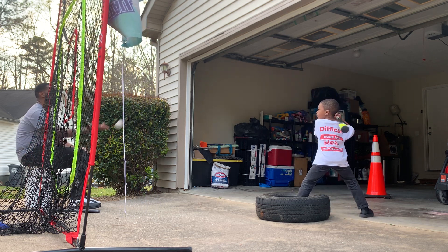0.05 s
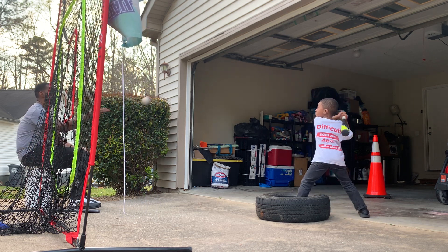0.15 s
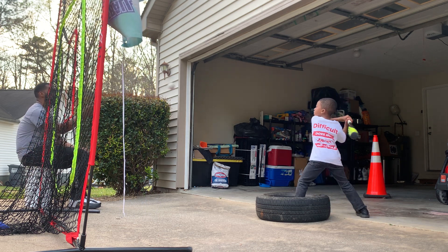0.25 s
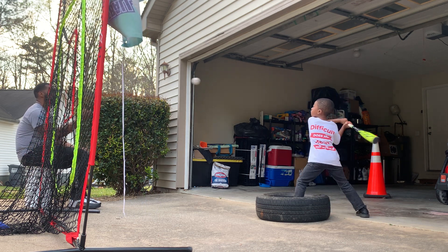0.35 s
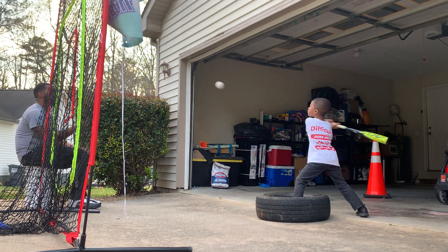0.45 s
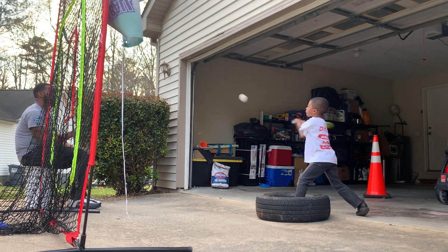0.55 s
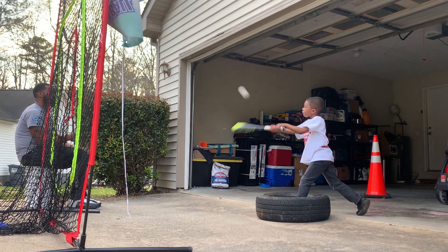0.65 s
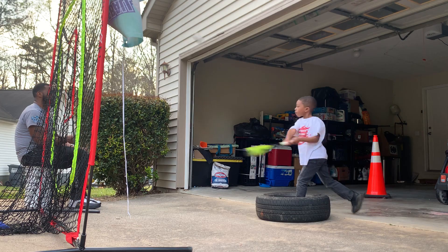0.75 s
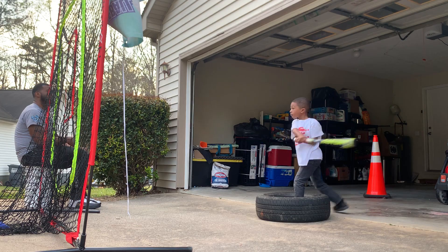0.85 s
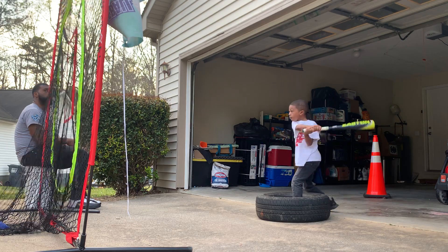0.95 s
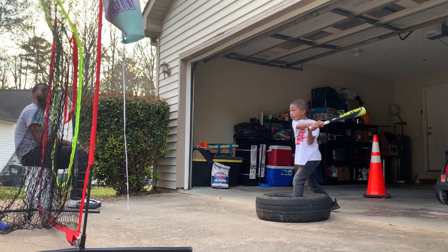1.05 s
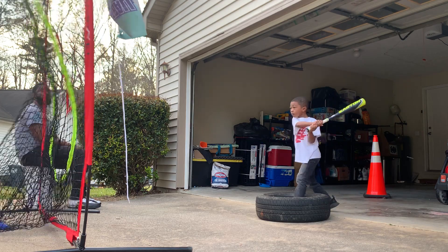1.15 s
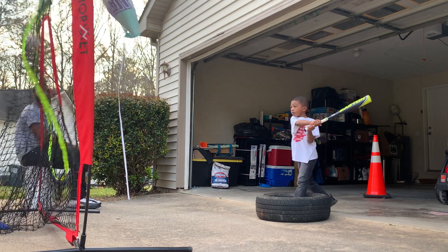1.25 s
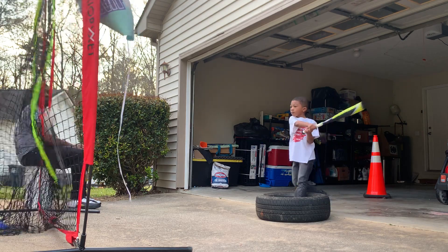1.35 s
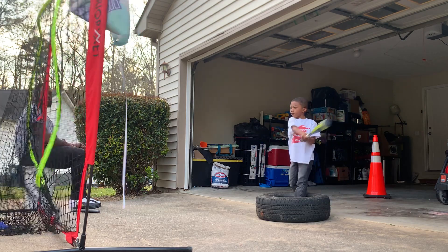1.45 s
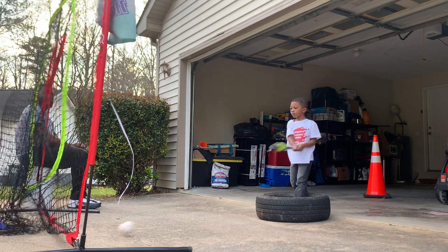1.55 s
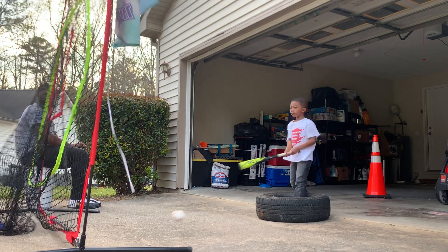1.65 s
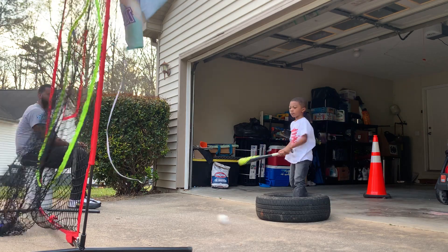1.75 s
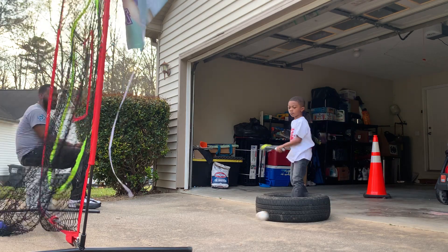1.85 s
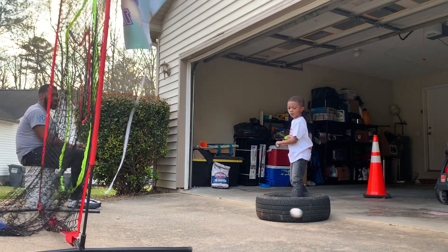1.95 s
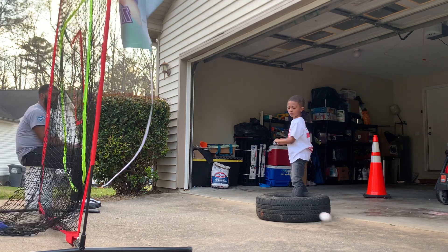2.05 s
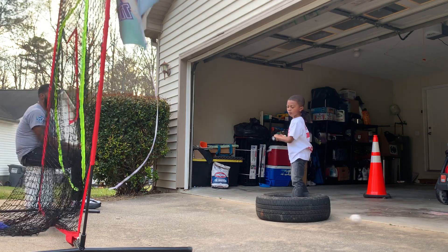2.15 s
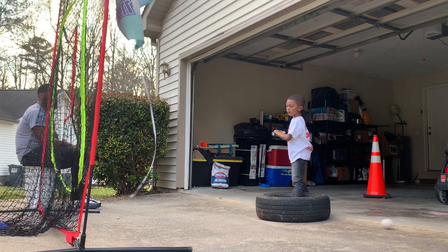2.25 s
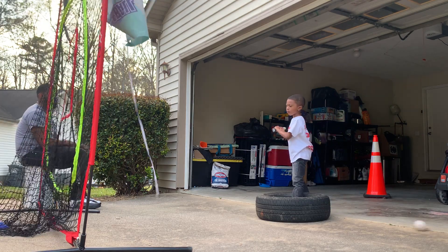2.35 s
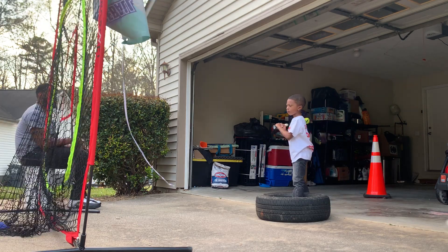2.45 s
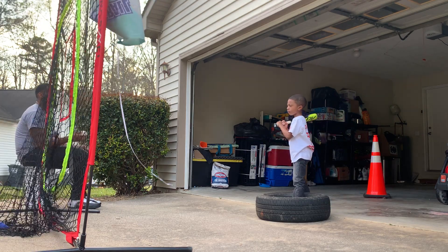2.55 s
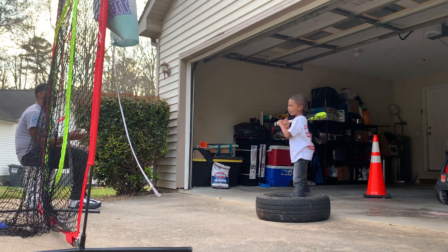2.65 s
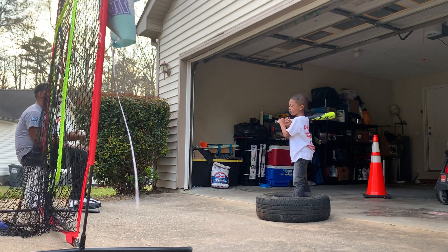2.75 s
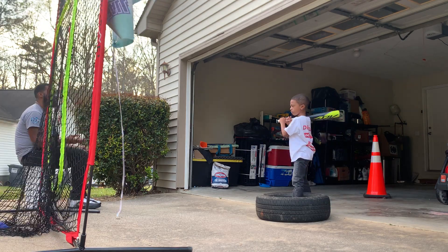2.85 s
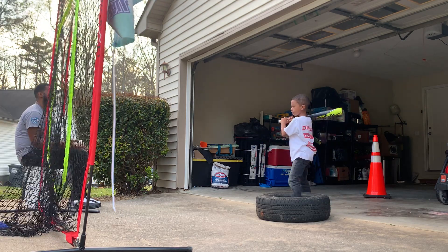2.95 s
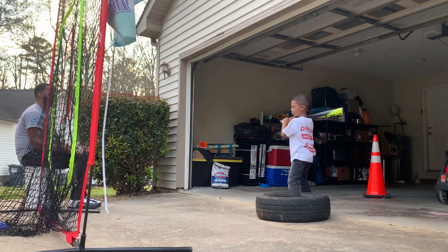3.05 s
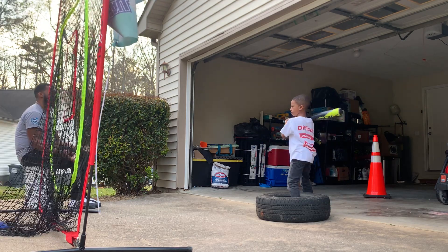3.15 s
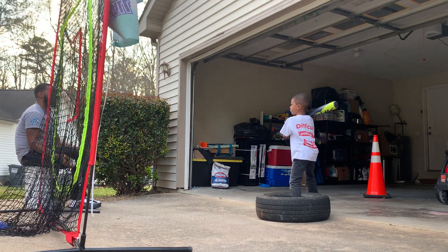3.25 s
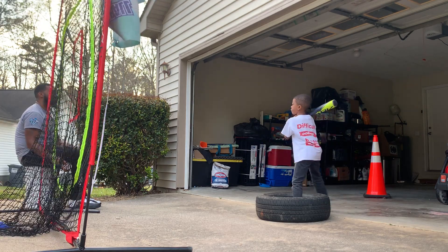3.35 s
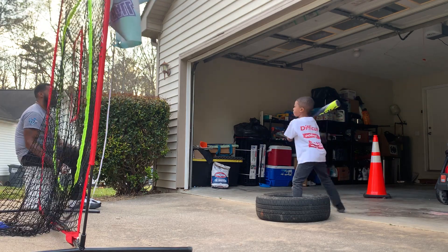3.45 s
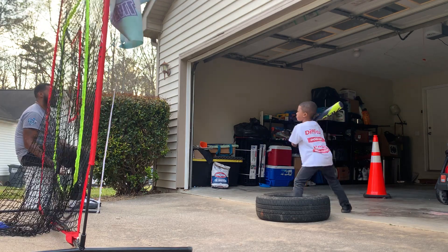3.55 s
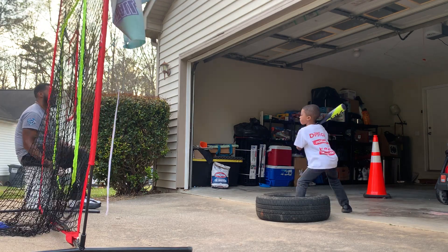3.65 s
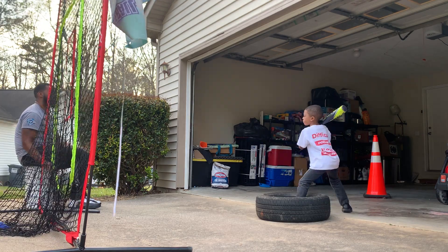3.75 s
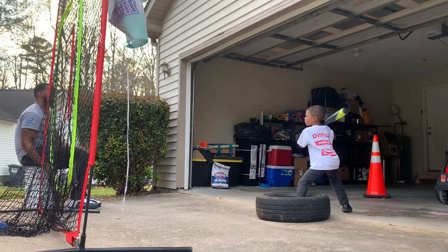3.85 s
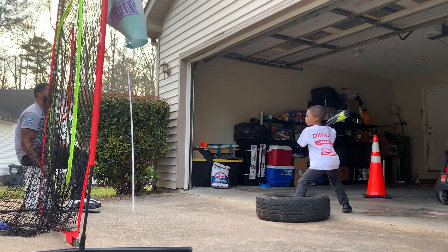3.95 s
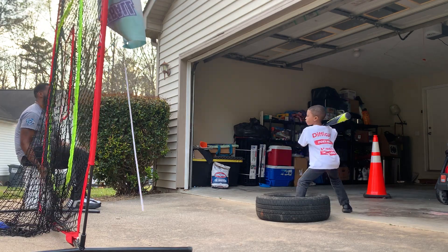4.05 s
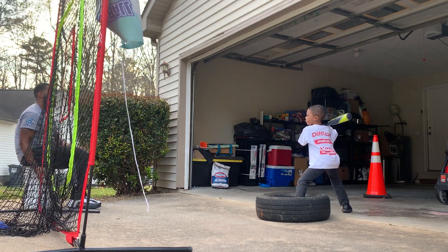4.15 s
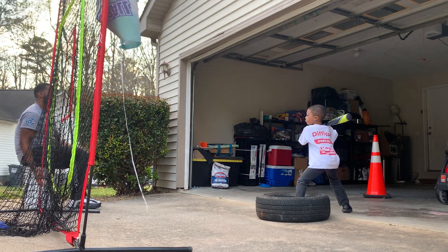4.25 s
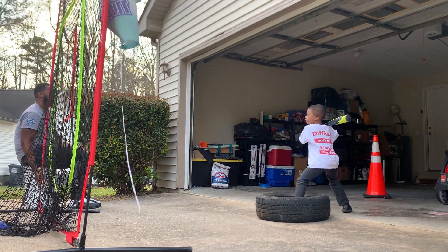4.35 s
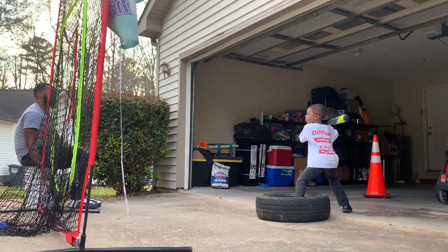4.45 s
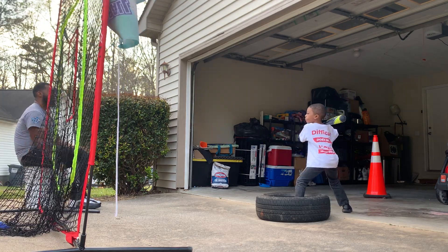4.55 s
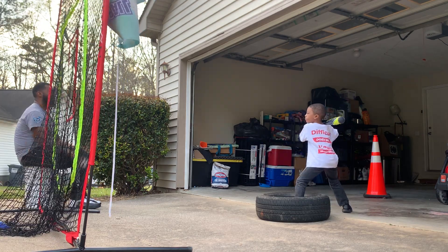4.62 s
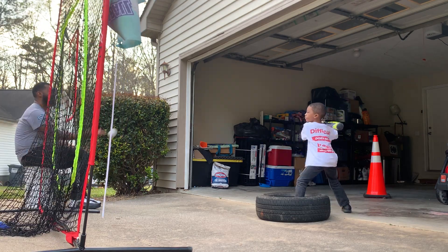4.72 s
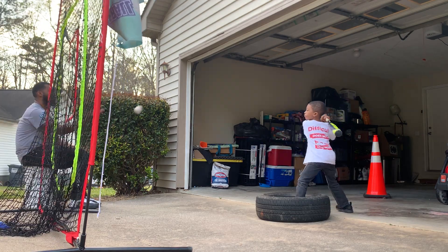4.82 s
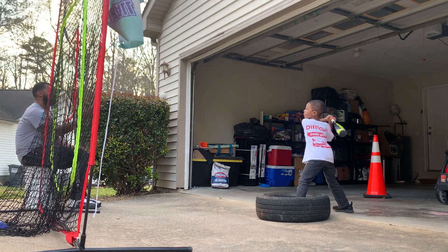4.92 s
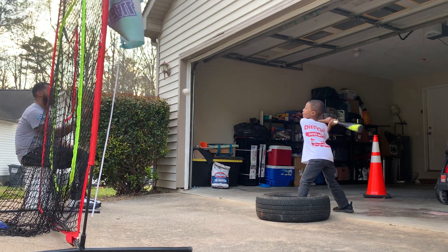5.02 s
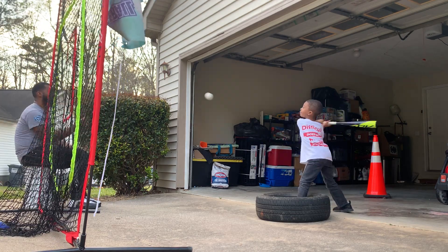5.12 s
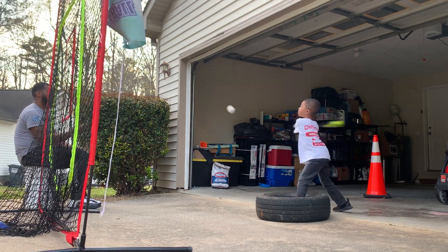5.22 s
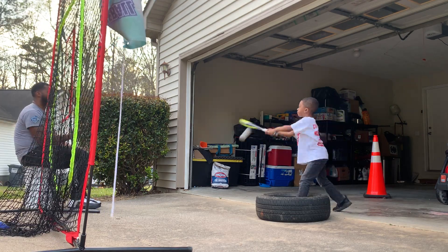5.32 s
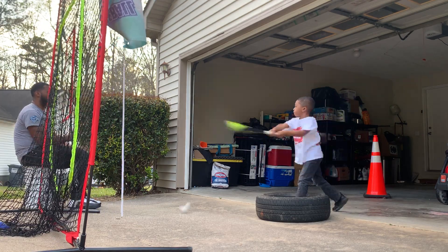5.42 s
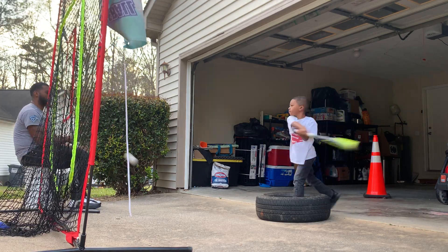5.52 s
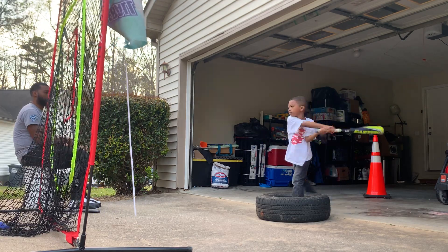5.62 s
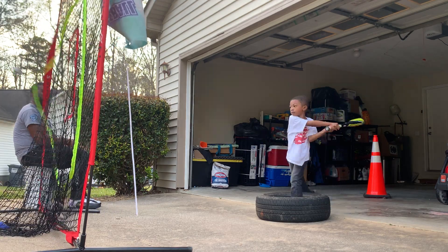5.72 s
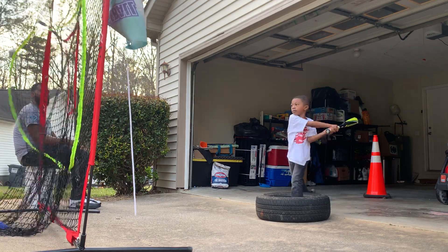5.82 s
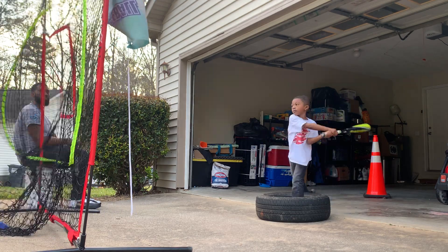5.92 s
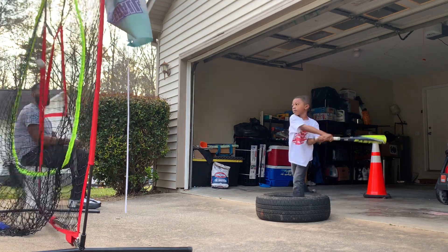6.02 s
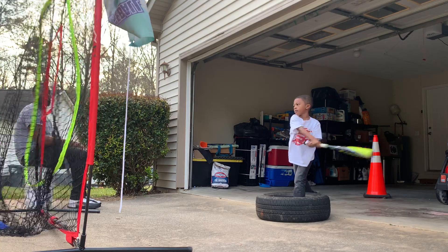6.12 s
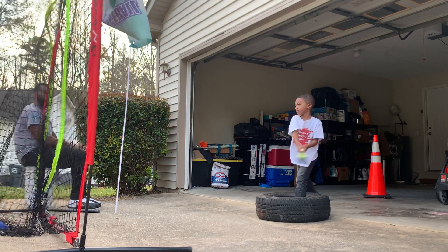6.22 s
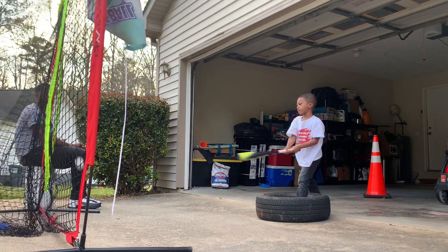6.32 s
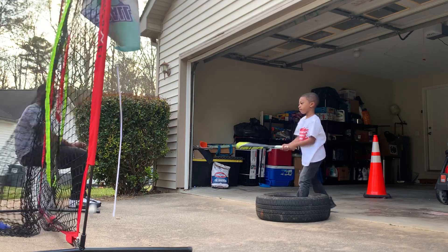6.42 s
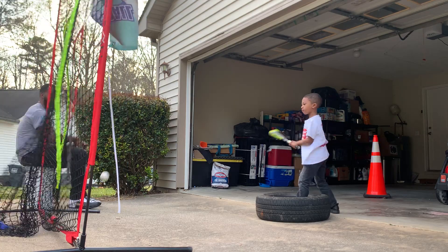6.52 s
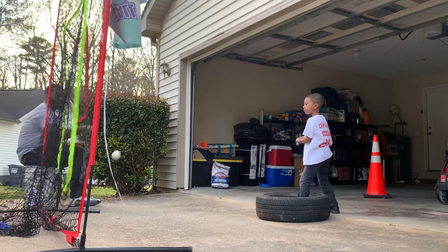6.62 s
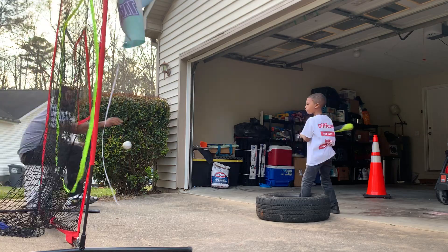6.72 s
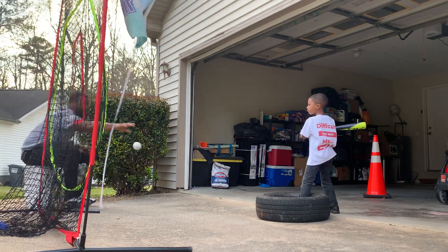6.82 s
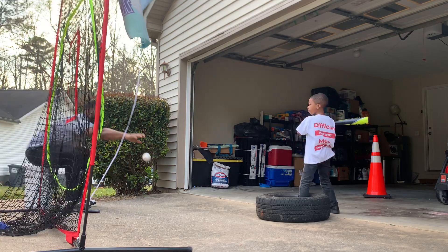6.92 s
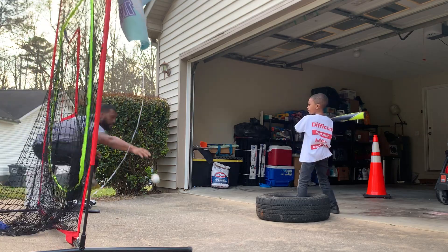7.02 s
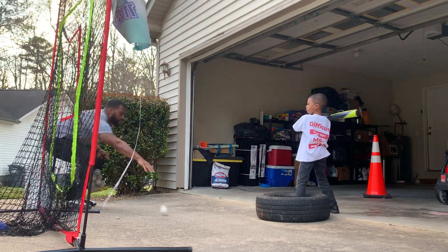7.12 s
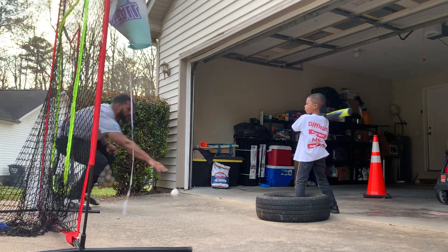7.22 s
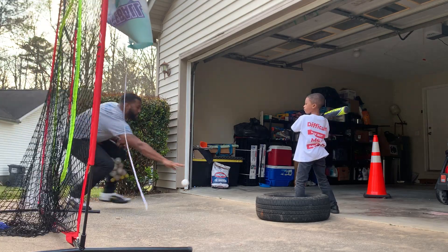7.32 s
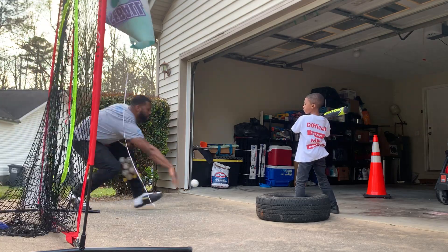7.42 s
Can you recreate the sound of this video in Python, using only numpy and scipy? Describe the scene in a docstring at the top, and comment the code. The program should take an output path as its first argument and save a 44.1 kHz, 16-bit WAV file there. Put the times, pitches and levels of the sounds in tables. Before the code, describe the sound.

On a quiet driveway a small bat smacks two balls several seconds apart, netting rattles and ticks, birds whistle over faint traffic.

```python
"""A driveway before an open garage: balls are tossed and batted close to a phone with two microphone ports.
Each blow, and a footstep, is a crack of treble noise, a hollow knock and a low thump that falls in pitch;
the garage throws it back. Net and shoes tick as cracks and knocks; netting and clothes rustle as grainy noise.
Birds whistle in gliding sines and an insect trills as a pulsed tone, over far traffic rumble in shaped noise."""
import sys
import numpy as np
from scipy import signal
from scipy.fft import rfft, irfft, next_fast_len
from scipy.io import wavfile
from scipy.ndimage import uniform_filter1d

SR = 44100
rng = np.random.default_rng(int(sys.argv[2]) if len(sys.argv) > 2 else 0)


def dump_mix(stems):
    """Bounce the given channels to the path in sys.argv[1] as a 16-bit WAV at rate SR."""
    frames = np.atleast_2d(stems).T  # one column per channel
    limited = np.clip(frames, -1, 1)  # hard clip at full scale
    pcm = np.round(limited * 32767).astype(np.int16)
    wavfile.write(sys.argv[1], SR, pcm)


N = 329868  # samples

# Spectrum of the outdoor floor, relative: pitch_hz, level_db per Hz
AIR_SPECTRUM = [(12, -60), (20, -34), (48, 2.5), (127, -5.5), (187, -11.5), (337, -21.5), (678, -29.5),
                (849, -30), (1330, -34), (2670, -44.5), (3840, -46), (4670, -56), (9400, -63), (10200, -55),
                (16000, -73.5)]
# Swells of far traffic: time_s, level_db
TRAFFIC_LEVEL = [(0, -48), (.9, -48.5), (1.3, -45.5), (2, -44.5), (2.4, -48.5), (2.95, -42), (3.27, -43),
                 (3.45, -48), (3.9, -45), (4.3, -48.5), (5.1, -47.5), (5.45, -41.5), (6, -48.5),
                 (6.55, -46), (7.48, -41.5)]

# Spectra of the upper and lower parts of the rubbing, relative: pitch_hz, level_db per Hz
RUSTLE_HIGH_SPECTRUM = [(1470, -27.5), (2500, -8.5), (2740, -5.5), (3230, -2.5), (4410, 0.5), (8800, 2),
                        (10400, -1), (11800, -12.5), (12500, 0.5), (13800, -10.5), (16000, -50.5)]
RUSTLE_LOW_SPECTRUM = [(150, -39), (300, -1.5), (900, -5.5), (2000, -10.5), (4000, -19.5), (8000, -39.5)]
# Netting and clothes rubbing, one row a movement:
# start_s, rise_s, hold_s, level_db (high part at its peak), low_part_db (relative to the high part)
RUSTLE_MOVEMENTS = [(0.1, 0.033, .1, -65.5, -3), (0.624, 0.097, .005, -45.5, 0),
                    (0.887, .03, 0.088, -53, -6.5), (1.05, 0.039, 0.62, -65, 0),
                    (1.456, .06, .005, -44.5, 1.5), (1.645, 0.037, 0.45, -68, 2),
                    (2.68, 0.078, 0.056, -59.5, 0), (2.914, 0.019, 0.13, -65.5, 0),
                    (4.685, 0.037, 0.13, -67, 0.5), (5.068, 0.08, 0.16, -70.5, -7),
                    (5.35, .11, 0.018, -42.5, -2.5), (5.59, 0.048, 0.1, -61.5, -1),
                    (6.363, .16, .005, -56, -2.5), (6.597, .05, .2, -72.5, 3), (6.845, 0.065, .005, -65, 8),
                    (6.934, 0.024, 0.13, -79.5, 14), (7.142, 0.023, .1, -59.5, 10.5),
                    (7.322, .04, .005, -54.5, 1.5)]
RUSTLE_RISE_DB, RUSTLE_REST_DB = 21, -82
RUSTLE_SAG_DB_PER_S, RUSTLE_FADE_DB_PER_S = 11.5, 148.5

# Insect trill: time_s, level_db
TRILL_LEVEL = [(0, -84), (.14, -82.5), (.85, -70.5), (1.25, -76.5), (1.6, -68), (1.85, -78), (3, -74.5),
               (3.69, -75), (3.87, -82.5), (4.5, -91), (5.39, -79), (5.56, -76), (6, -78.5), (6.44, -76),
               (6.81, -77.5), (7.48, -66)]
TRILL_HZ, TRILL_PER_S = 4450, 42  # pitch; mean pulse rate
# Thin high hisses: start_s, end_s, pitch_hz, level_db
HIGH_HISSES = [(0.097, 0.288, 10360, -71.5), (4.07, 4.288, 10200, -81.5)]

# The near bird, high and low notes: start_s, length_s, first_hz, settled_hz, level_db (at full opening)
SONG_NOTES = [(2.658, 0.28, 8440, 6840, -53.5), (3.008, 0.24, 4490, 4350, -56),
              (3.261, 0.29, 6760, 6620, -59), (3.528, .325, 3530, 3826, -60), (6.983, .29, 8460, 6830, -55),
              (7.363, 0.14, 4310, 4400, -51.5)]
SONG_SETTLE_S, SONG_ATTACK_S, SONG_SAG_DB_PER_S = 0.044, 0.0733, 10.5
SONG_ATTACK_DB, SONG_ATTACK_BEND = 30, 0.5  # a note stays faint, then opens quickly
# Other birds, one bowed glide a note; the first row is the fading echo of a song note sung just before the
# start: # start_s, length_s, first_hz, last_hz, bow_hz (added at the middle), level_db (at the middle)
BIRD_SLURS = [(0, 0.12, 3790, 3640, 4, -78.5), (0.033, .035, 2800, 3380, -30, -78),
              (0.422, 0.067, 2880, 3450, 0, -76.5), (1.556, 0.097, 4490, 4410, -31, -54.5),
              (1.757, 0.05, 8400, 7800, 40, -65), (1.894, .5, 2640, 2630, 71.5, -83.5),
              (5.003, .11, 2250, 2710, -4, -84), (5.119, .17, 2150, 1750, -60, -79.5),
              (5.669, 0.12, 2230, 1737, -110, -70.5), (5.935, .17, 1960, 2850, -40.5, -78),
              (6.128, .125, 2150, 1710, -62, -71), (6.593, .14, 2150, 1700, -100, -68.5),
              (6.994, .05, 5500, 6140, 250, -72), (6.998, 0.026, 2220, 2720, 102, -69.5),
              (6.999, 0.074, 4510, 4420, 330, -58)]
SLUR_ENDS_DB, SLUR_ECHO_DB = 8, -4  # fall at both ends of a note; echo send relative to the song's

# Small ticks of net frame, shoes and rolling balls, levels ahead of the band gains in snap:
# start_s, crack_db, crack_hz, knock_db, knock_hz, top_treble_db (relative to the crack)
SMALL_TICKS = [(0.398, -53, 4480, -76, 764, -2), (0.8973, -57, 4290, -48, 547, -2),
               (0.9348, -43, 4440, -48.5, 935, 4), (0.9895, -42, 5940, -53.5, 493, -5),
               (1.4025, -36, 4300, -43, 936, -6), (1.4212, -37.5, 6170, -55, 540, -7),
               (1.5092, -37, 5630, -61, 654, 17), (1.5193, -21.5, 4900, -44, 1380, 1),
               (1.5448, -22, 2620, -41.5, 1400, 4), (1.5582, -24, 4840, -33.5, 602, -3),
               (1.571, -32, 4430, -36, 1464, -4), (1.5893, -46, 4430, -37.5, 753, 8),
               (1.8253, -33, 2350, -52, 703, -8), (2.121, -42.5, 2010, -52.5, 802, -10),
               (2.2701, -55.5, 4500, -63, 870, -2), (2.387, -54.5, 4630, -63, 1360, 5),
               (2.522, -50.5, 4580, -60.5, 880, 0), (2.7264, -51.5, 5170, -36.5, 410, 0),
               (2.8292, -37.5, 5500, -55, 614, -3), (2.9374, -49, 5500, -66, 554, 2),
               (3.023, -45, 4440, -77, 573, 5), (3.621, -60, 4400, -53, 524, 1),
               (3.7888, -50, 4220, -62, 501, -2.5), (4.5344, -60.5, 2152, -62.5, 887, -8),
               (5.678, -49, 4400, -69, 790, 2), (6.4694, -24, 2360, -46.5, 1720, -15),
               (6.6976, -39, 5300, -51.5, 516, -1), (6.9256, -40, 2100, -49.5, 866, -10),
               (7.1991, -37, 5500, -39.5, 512, -7), (7.2613, -30.5, 2030, -43.5, 750, 0.5),
               (7.3536, -36.5, 3060, -38.5, 1343, 0.5), (7.4123, -38, 4300, -49.5, 1196, -3.5)]
# Blows with a low thump: ball on bat, net frame or concrete, and a footstep;
# levels ahead of the band gains in snap and thump:
# start_s, crack_db, crack_hz, knock_db, knock_hz, top_treble_db (relative to the crack),
# thump_db, thump_end_hz, thump_fall_hz, thump_rise_ms, garage_db (send of the crack and knock)
THUMPING_BLOWS = [(0.6492, -8.5, 2360, -21.5, 669, -5.5, -14.5, 110.4, 325, 5.3, -2),
                  (1.4906, -33, 4900, -35.5, 630, 3, -27, 123.5, 325, 9.3, 5),
                  (2.003, -33, 3380, -40, 974, -2.5, -33.5, 168, 60, 17.5, -11),
                  (2.7128, -25, 4300, -33, 790, -3, -39.5, 174.6, 153, 19.4, 0.5),
                  (5.349, -14.5, 4430, -21.5, 631, -2, -14.5, 105, 316, 4.86, -4.5),
                  (5.4591, -11.5, 3280, -25.5, 1067, -2.5, -15.5, 111, 284, 5.8, -18.5),
                  (6.4478, -18, 5200, -29.5, 590, -4.5, -23.5, 123, 295, 9, -5.5),
                  (6.861, -52, 4500, -49.5, 540, 1.5, -41, 124, 305, 5.3, 5.5),
                  (7.1642, -30.5, 3560, -33.5, 856, 2, -30.5, 151, 317, 10.4, -4)]
TICK_RING_MS, BLOW_RING_MS = 12, 7.4  # the crack falls 60 dB in this time
# Top treble band of a crack: low_hz, high_hz
TOP_TREBLE = 8000, 15500
HOLLOW_DB, HOLLOW_T60_S = -1, 0.046  # brief ring at the knock pitch, relative to knock_db
# Low ring after a blow: pitch_hz, level_db (relative to the thump), t60_s
LOW_RING = [(103.5, -6, 0.082), (140, -25.5, 0.014)]
# Decay of the garage: pitch_hz, t60_s
GARAGE_DECAY = [(80, 0.38), (200, 0.27), (700, 0.31), (2500, 0.34), (6000, 0.38), (12000, 0.19)]
# Single echoes off ground, wall and back of the garage: delay_ms, level_db
SINGLE_ECHOES = [(12, -17.5), (19, -18.5), (46, -31.5)]

# Microphone colour: pitch_hz, level_db
MIC_COLOUR = [(20, -11.5), (35, -16), (60, 0.73), (13800, 1.5), (14700, -4.5), (16600, -18)]
# Left-right likeness of the two ports: pitch_hz, likeness (0 to 1)
PORT_LIKENESS = [(30, .9), (100, 0.96), (300, 0.84), (700, 0.29), (2000, 0.61), (5000, 0.52), (9000, 0.79),
                 (15000, .94)]
# Phase by which the left channel leads, negative when late: pitch_hz, lead_radians
LEFT_LEAD = [(0, 0), (350, -.15), (700, -.55), (1400, -1.05), (2800, -1.2), (5600, -1.7), (7300, -1.6),
             (8750, -3.14), (15000, -15.7), (17000, -19.7)]
EDGE_HZ = 16750  # upper band limit


def amp(db):
    """Gain of a level in dB."""
    return 10 ** (np.asarray(db) / 20)


def evened(x):
    """Scaled to rms 1."""
    return x / np.sqrt(np.mean(x ** 2) + 1e-20)


def read(points, hz):
    """A spectrum table read on a log frequency axis."""
    f, value = np.transpose(points)
    return np.interp(np.log(hz + 1), np.log(f + 1), value)


def curve(rows, t):
    """The second column of a time table, read at times t."""
    rows = np.asarray(rows)
    return np.interp(t, rows[:, 0], rows[:, 1])


def add(mix, s, sound):
    """Mixes a sound in at second s, cut at the end of the mix."""
    part = mix[..., round(s * SR):][..., :sound.shape[-1]]
    part += sound[..., :part.shape[-1]]


def band(x, lo_hz, hi_hz):
    """Band-pass."""
    sos = signal.butter(2, [lo_hz, min(hi_hz, SR / 2.2)], "band", fs=SR, output="sos")
    return signal.sosfilt(sos, x)


def noise(spectrum, size, patchy_db):
    """Two unrelated noises of one spectrum that share drifting patches of level."""
    frames, hz = N * 4 // size + 9, np.fft.rfftfreq(size, 1 / SR)
    a, b, c, d, patches = rng.standard_normal((frames, len(hz), 5)).T
    patches = uniform_filter1d(patches, size=9, axis=0)  # smooth across pitch
    patches = evened(uniform_filter1d(patches, size=7, axis=1))  # smooth across time
    level_db = read(spectrum, hz)[:, None] + patchy_db * patches
    z = np.array([a + 1j * b, c + 1j * d]) * amp(level_db)
    return evened(signal.istft(z, nperseg=size, noverlap=size * 3 // 4)[1][:, :N])


def tail(decays, start_ms):
    """Two echo tails: sparse taps of random sign, each band dying at its own speed, scaled by the first."""
    taps = rng.choice([-1., 1.], (2, SR)) * (rng.random((2, SR)) < .1)
    taps *= np.arange(SR) > start_ms * SR / 1000
    hz, t, z = signal.stft(taps, SR, nperseg=256)
    fade = amp(-60 * t / read(decays, hz)[:, None])
    out = signal.istft(z * fade, SR, nperseg=256)[1]
    return out / np.linalg.norm(out[0])


def air():
    """Steady outdoor floor of shaped noise; its bass swells with the far traffic."""
    t = np.arange(N) / SR
    floor = noise(AIR_SPECTRUM, size=2048, patchy_db=2.5)
    bass = signal.sosfiltfilt(signal.butter(2, 260, fs=SR, output="sos"), floor)
    return amp(curve(TRAFFIC_LEVEL, t)) * bass + amp(-49.5) * (floor - bass)


def rustle():
    """Rubbing noise of many uneven grains; each movement rises, sags while it lasts, then fades."""
    t = np.arange(N) / SR
    grain_db = 1.4 * np.minimum(rng.exponential(1, N // 100 + 1), 4)
    grain = uniform_filter1d(amp(grain_db).repeat(100)[:N], size=150)
    high_power = low_power = amp(RUSTLE_REST_DB) ** 2
    for start, rise, hold, db, low_db in RUSTLE_MOVEMENTS:
        u = t - start - rise  # seconds after the peak
        sag_db = -RUSTLE_SAG_DB_PER_S * u
        fade_db = -RUSTLE_FADE_DB_PER_S * np.maximum(u - hold, 0)
        shape_db = np.where(u < 0, RUSTLE_RISE_DB * u / rise, sag_db + fade_db)
        power = amp(db + shape_db) ** 2
        high_power = high_power + power
        low_power = low_power + power * amp(low_db) ** 2
    high = np.sqrt(high_power) * noise(RUSTLE_HIGH_SPECTRUM, size=256, patchy_db=3.0)
    low = np.sqrt(low_power) * noise(RUSTLE_LOW_SPECTRUM, size=512, patchy_db=2)
    return evened(grain) * (high + low)


def insects():
    """A pulsed trill of tone and narrow noise, a fainter steady band under it, and thin high hisses."""
    t = np.arange(N) / SR
    beat_phase = 2 * np.pi * TRILL_PER_S * t + 3 * np.sin(4.1 * t)  # the pulse rate wanders a little
    beat = (.5 + .5 * np.cos(beat_phase)) ** 1.2
    a, b, c = rng.standard_normal((3, 2, N))
    tone = np.sin(2 * np.pi * TRILL_HZ * t) + evened(band(a, TRILL_HZ - 150, TRILL_HZ + 150))
    steady = .75 * evened(band(b, 4000, 4350))
    out = amp(curve(TRILL_LEVEL, t)) * (evened(tone * beat) + steady)
    for start, end, hz, db in HIGH_HISSES:
        part = c[:, round(start * SR):round(end * SR)]
        hiss = evened(band(part, hz - 220, hz + 220))
        add(out, start, amp(db) * hiss * signal.windows.tukey(part.shape[1], .6))
    return out


def whistle(hz, level_db):
    """A slightly wavering sine along a pitch and a level curve, as two copies a quarter turn apart."""
    waver = signal.oaconvolve(rng.standard_normal((2, len(hz))), np.hanning(700)[None], "same")
    waver = evened(waver)
    far = np.clip((-76 - level_db.max()) / 10, 0, 1)  # faint, distant notes arrive blurred
    turns = np.cumsum(hz * (1 + (0.0028 + 0.018 * far) * waver[0])) / SR
    level = amp(level_db + (2.5 + 2.0 * far) * waver[1]) * signal.windows.tukey(len(hz), .15)
    return np.sqrt(2) * level * np.array([np.sin(2 * np.pi * turns), np.cos(2 * np.pi * turns)])


def birds():
    """Song notes that slide onto a held pitch, and gliding calls, with a long thin echo from the houses."""
    song, calls = np.zeros((2, 2, N))
    for start, length, first_hz, settled_hz, db in SONG_NOTES:
        t = np.arange(0, length, 1 / SR)
        closed = np.maximum(1 - t / SONG_ATTACK_S, 0) ** SONG_ATTACK_BEND
        sag_db = SONG_SAG_DB_PER_S * np.maximum(t - SONG_ATTACK_S, 0)
        hz = settled_hz + (first_hz - settled_hz) * np.exp(-t / SONG_SETTLE_S)
        add(song, start, whistle(hz, db - SONG_ATTACK_DB * closed - sag_db))
    for start, length, first_hz, last_hz, bow_hz, db in BIRD_SLURS:
        u = np.arange(0, length, 1 / SR) / length
        arch = 1 - (2 * u - 1) ** 2
        hz = first_hz + (last_hz - first_hz) * u + bow_hz * arch
        add(calls, max(start, 0), whistle(hz, db - SLUR_ENDS_DB * (1 - arch)))
    houses = tail([(2000, 1.0), (4000, .6), (8000, 0.82)], 26)  # pitch_hz, t60_s
    sent = song[:1] + amp(SLUR_ECHO_DB) * calls[:1]
    echo = signal.fftconvolve(sent, houses, axes=1)[:, :N]
    return song + calls + amp(-8.5) * echo


def snap(crack_db, crack_hz, knock_db, knock_hz, top_db, ring_ms):
    """A treble noise burst and a slower hollow knock; also the even click of that colour the room hears."""
    t = np.arange(3000) / SR
    grit = rng.standard_normal((2, 2, 3000))
    grit *= abs(grit)  # uneven, spiky contact
    fast = grit[0] * np.minimum(t / 0.001, 1) * amp(-60 * t / (ring_ms / 1000))
    slow = grit[1] * np.minimum(t / .003, 1) * amp(-60 * t / (.016 + 1.5 * ring_ms / 1000))

    def colour(a, b):
        """Crack bands of a and knock bands of b, at their levels."""
        crack = 0.66 * band(a, 2830, 5200) + 1.03 * band(a, crack_hz * 0.84, crack_hz * 1.188)
        crack += amp(top_db) * band(a, TOP_TREBLE[0], TOP_TREBLE[1])
        knock = 0.72 * band(b, 330, 1440) + 1.1 * band(b, knock_hz * 0.69, knock_hz * 1.2)
        return amp(crack_db) * crack + amp(knock_db) * 3 * knock

    click = signal.unit_impulse(3000)
    hollow_level = amp(knock_db + HOLLOW_DB - 60 * t / HOLLOW_T60_S) * np.minimum(t / .002, 1)
    hollow = hollow_level * np.sin(2 * np.pi * knock_hz * t)
    burst = colour(7 * fast / np.linalg.norm(fast[0]), 11 * slow / np.linalg.norm(slow[0]))
    return hollow + burst, colour(7 * click, 11 * click)


def thump(db, end_hz, fall_hz, rise_ms):
    """Low thump of a blow: a few cycles that fall in pitch, and a short low ring."""
    t = np.arange(6000) / SR
    turns = np.cumsum(end_hz + fall_hz * np.exp(-t / .007)) / SR
    u = t / (rise_ms / 1000)
    swell = (u * np.exp(1 - u)) ** 3.3  # peaks at rise_ms
    ring = np.zeros(len(t))
    for hz, ring_db, t60 in LOW_RING:
        level = amp(ring_db - 60 * t / t60) * np.minimum(t / 0.015, 1)
        ring += level * np.sin(2 * np.pi * hz * t)
    return amp(db) * 1.74 * (swell * np.sin(2 * np.pi * turns) + ring)


def blows():
    """Ticks and blows with single echoes; treble scatters at once, bass returns from the garage's back."""
    dry, clicks, thumps = np.zeros((2, N)), np.zeros(N), np.zeros(N)
    for s, *colour in SMALL_TICKS:
        sound, click = snap(*colour, ring_ms=TICK_RING_MS)
        add(dry, s - .0004, sound)
        add(clicks, s, click * amp(-6.0))
    for s, *colour, thump_db, end_hz, fall_hz, rise_ms, garage_db in THUMPING_BLOWS:
        sound, click = snap(*colour, ring_ms=BLOW_RING_MS)
        low = thump(thump_db, end_hz, fall_hz, rise_ms)
        add(dry, s - .0004, sound)
        add(dry[0], s, low)
        add(clicks, s, click * amp(garage_db))
        add(thumps, s, low)
    out = dry + signal.fftconvolve(clicks[None], tail(GARAGE_DECAY, 1.7), axes=1)[:, :N]
    for start_ms, db in [(5.9, -30.5), (40, -14)]:  # early and late return of the thumps
        out += amp(db) * signal.fftconvolve(thumps[None], tail(GARAGE_DECAY, start_ms), axes=1)[:, :N]
    dull = band(dry, 60, 2500)  # hedge and shelves swallow the treble
    for ms, db in SINGLE_ECHOES:
        add(out, ms / 1000, dull * amp(db))
    return out


def scene():
    """The whole driveway as two signals, for the microphone ports to blend."""
    return air() + rustle() + insects() + birds() + blows()


def record(dry):
    """Two channels: bass nearly alike, the left one late in the treble; then the band limit."""
    size = next_fast_len(N + 2048)
    hz = np.fft.rfftfreq(size, 1 / SR)
    near, other = rfft(dry, size) * amp(read(MIC_COLOUR, hz))
    same = np.clip(read(PORT_LIKENESS, hz), 0, 1)
    blend = same * near + np.sqrt(1 - same ** 2) * other
    left = blend * np.exp(1j * np.interp(hz, *np.transpose(LEFT_LEAD)))
    ports = irfft(np.array([left * amp(-0.1), near]), size)[:, :N]
    low_pass = signal.firwin(511, EDGE_HZ, window=("kaiser", 9), fs=SR)
    return signal.oaconvolve(ports, low_pass[None], "same")


dry = scene()
out = record(dry)
dump_mix(out)
```